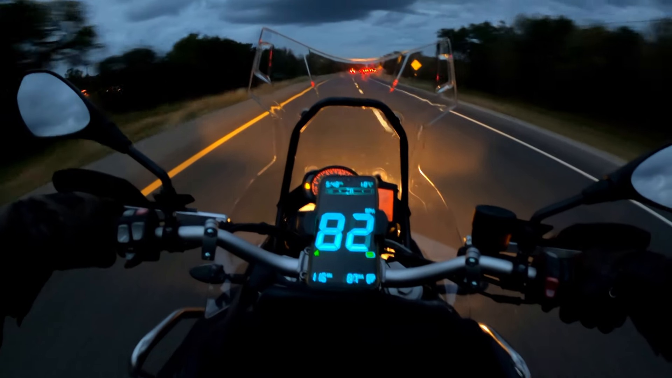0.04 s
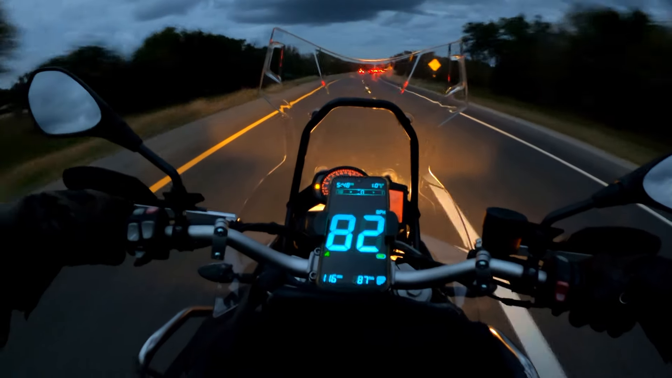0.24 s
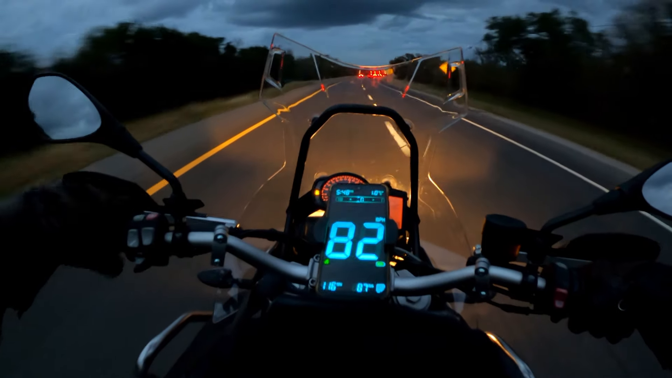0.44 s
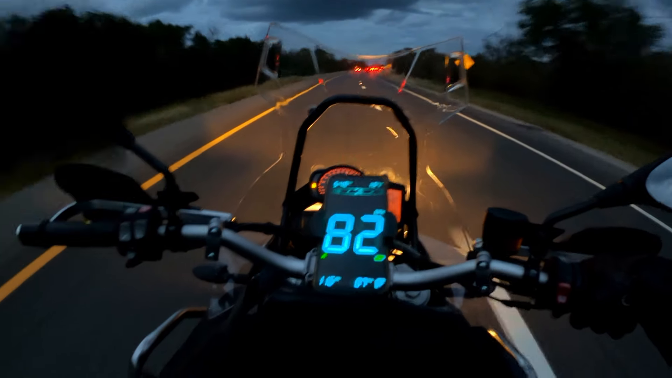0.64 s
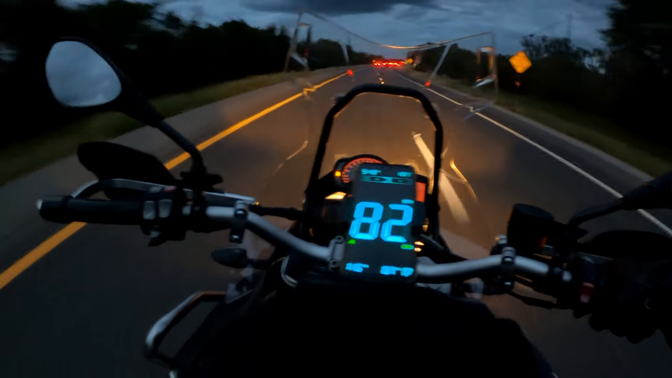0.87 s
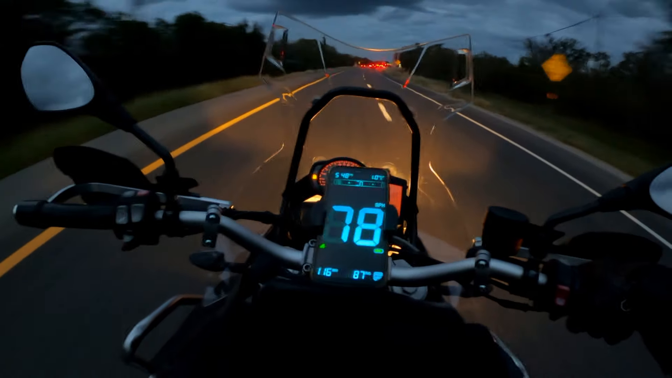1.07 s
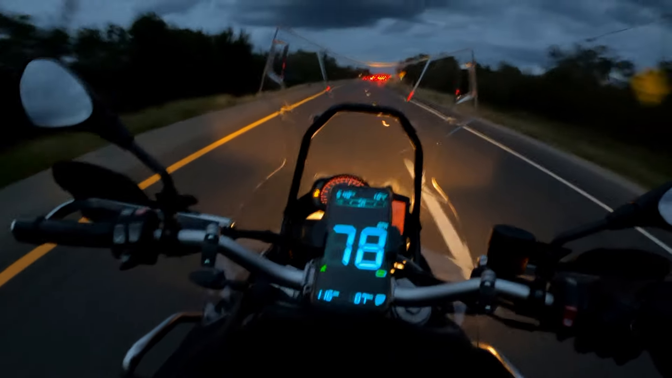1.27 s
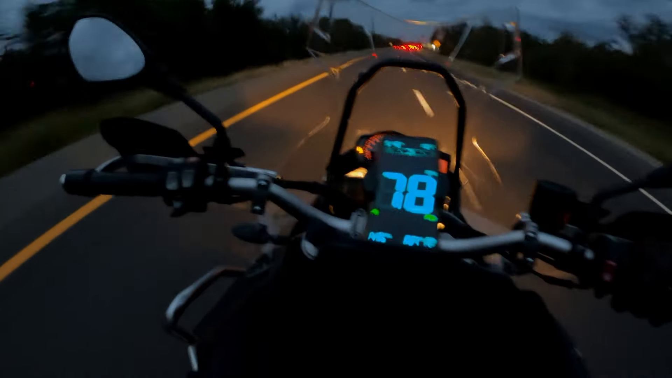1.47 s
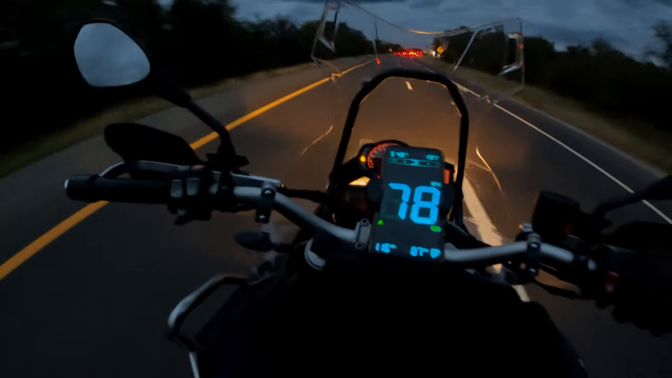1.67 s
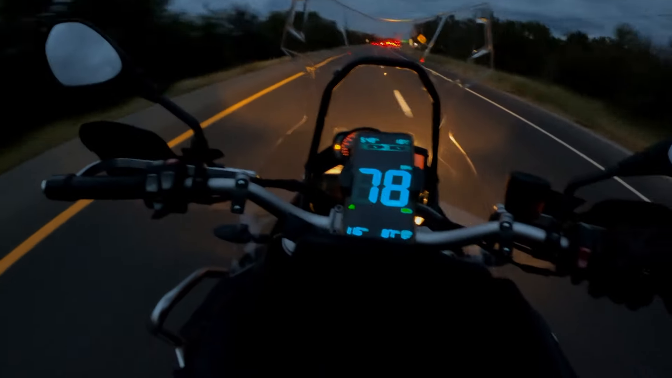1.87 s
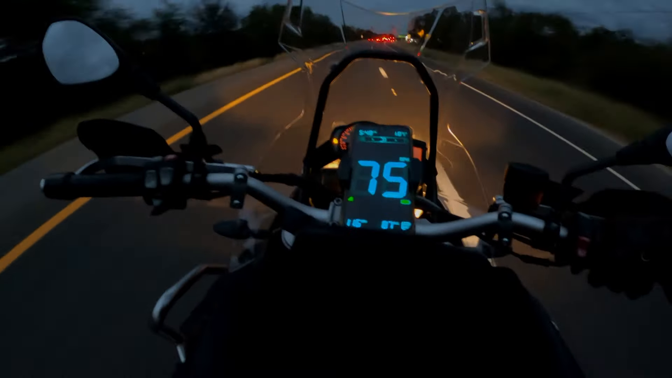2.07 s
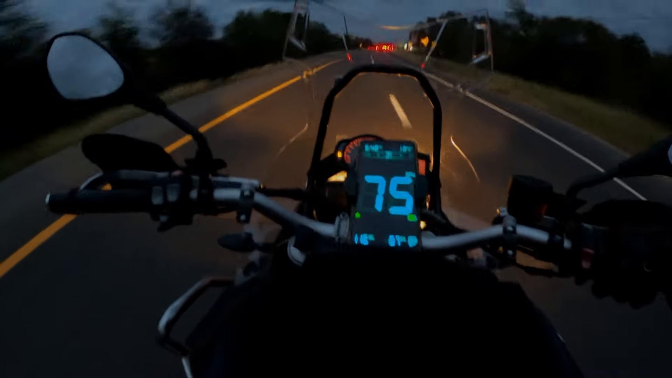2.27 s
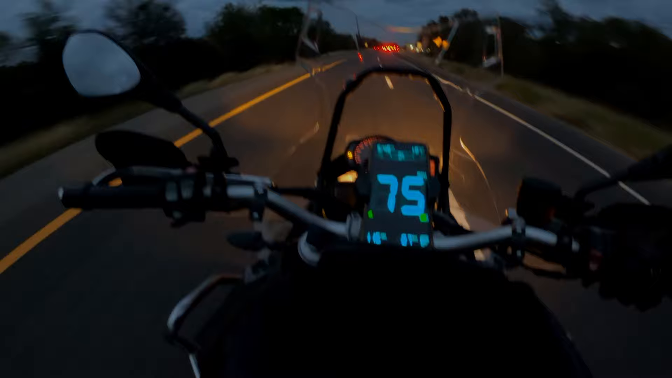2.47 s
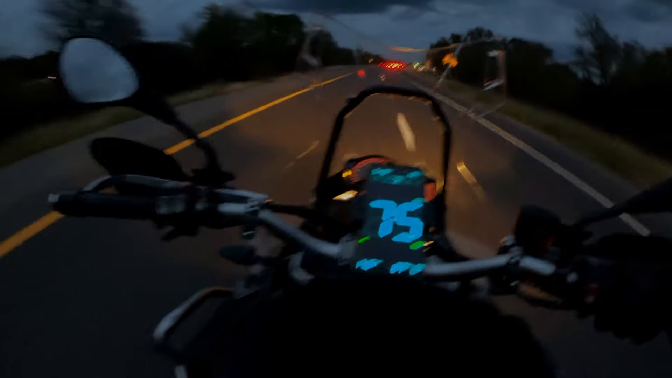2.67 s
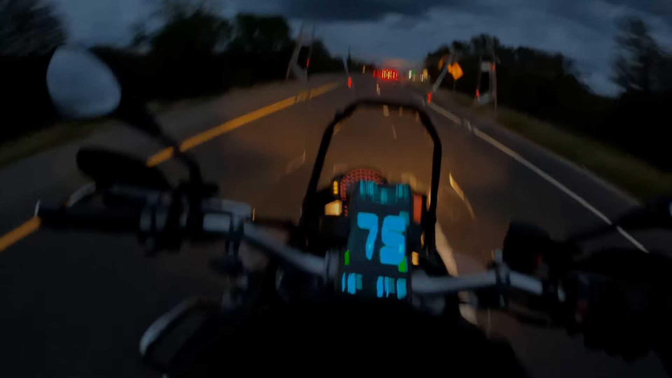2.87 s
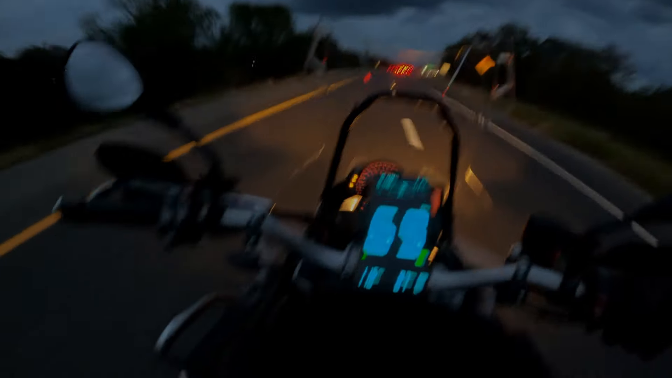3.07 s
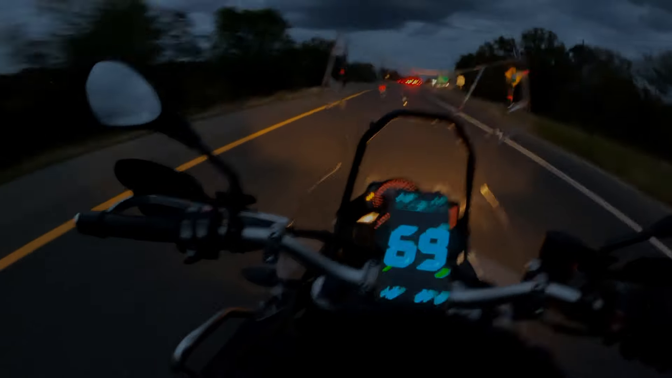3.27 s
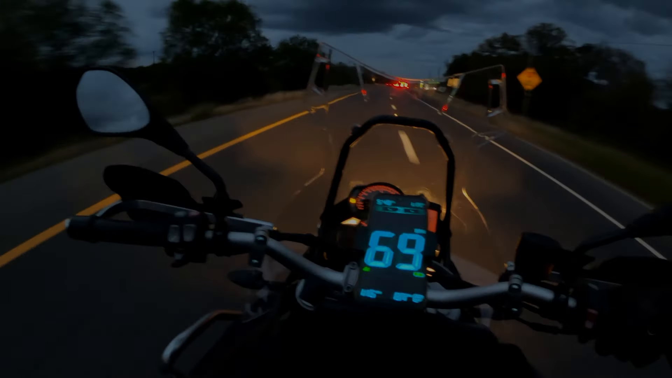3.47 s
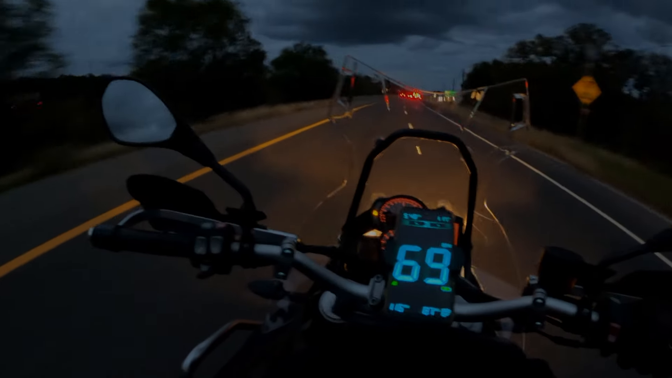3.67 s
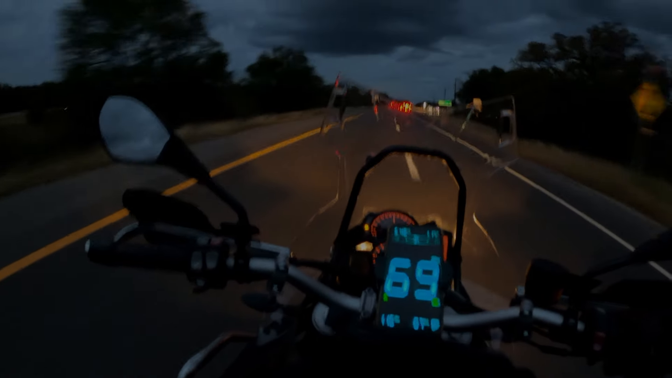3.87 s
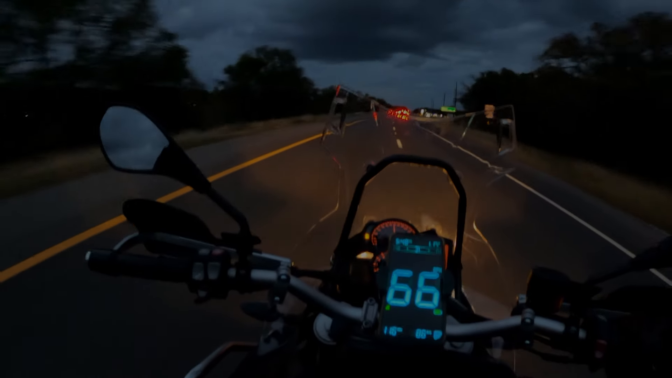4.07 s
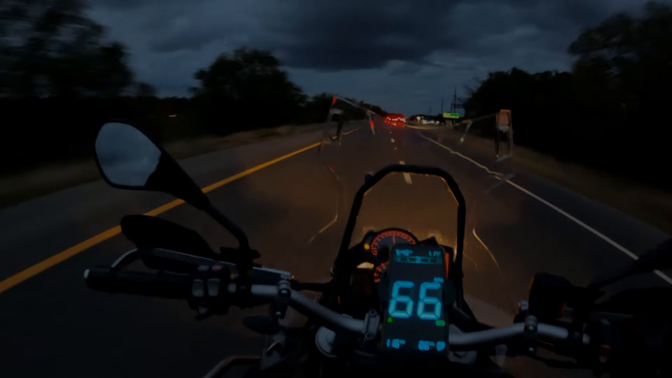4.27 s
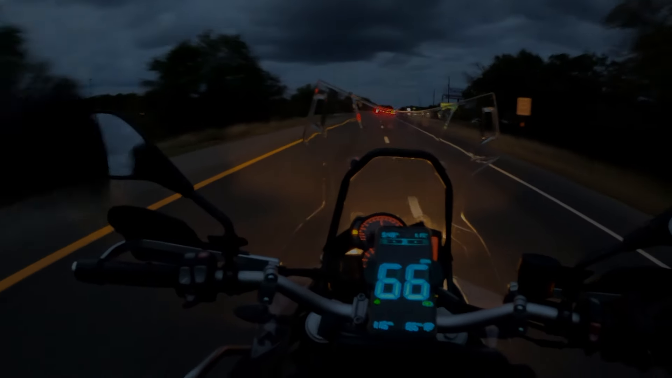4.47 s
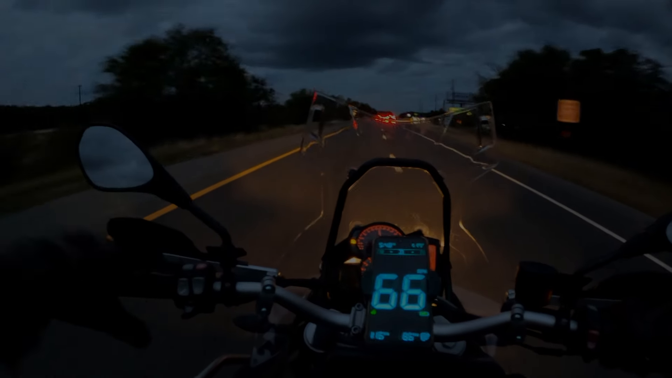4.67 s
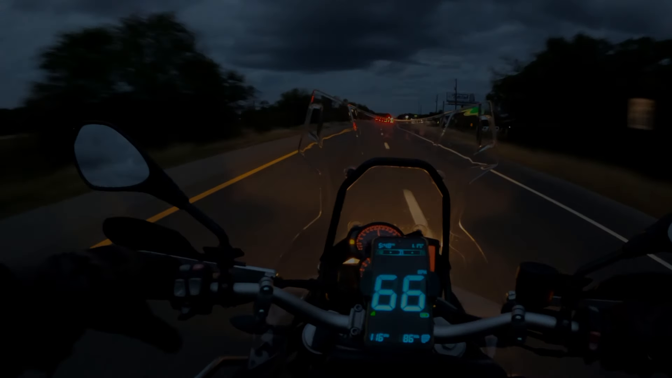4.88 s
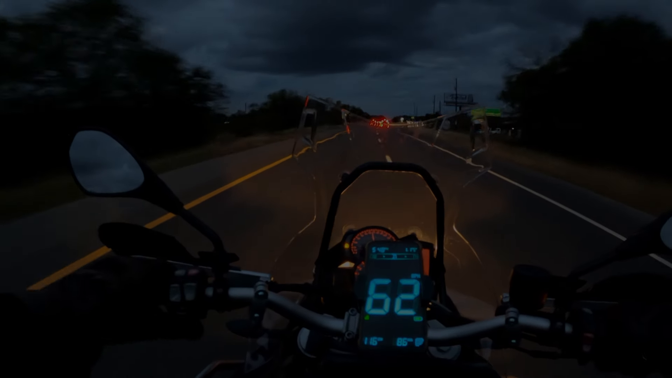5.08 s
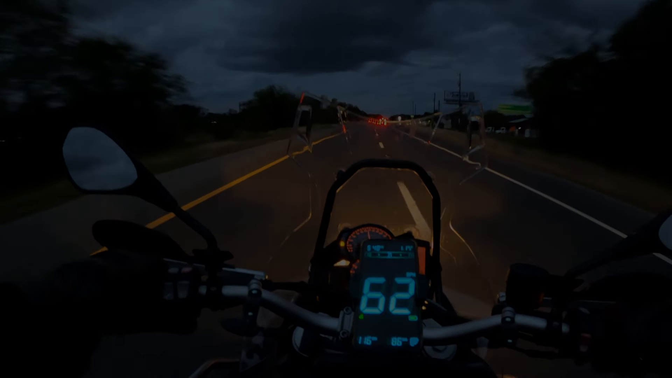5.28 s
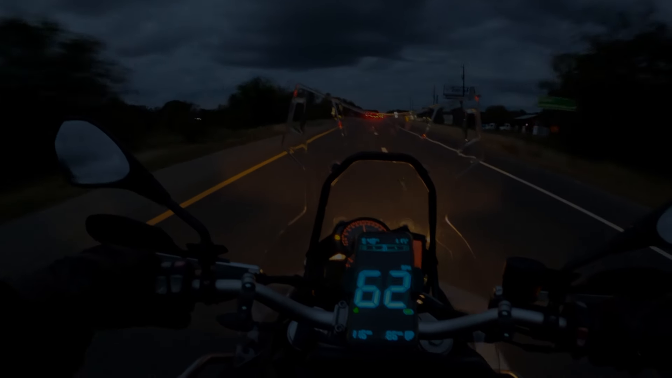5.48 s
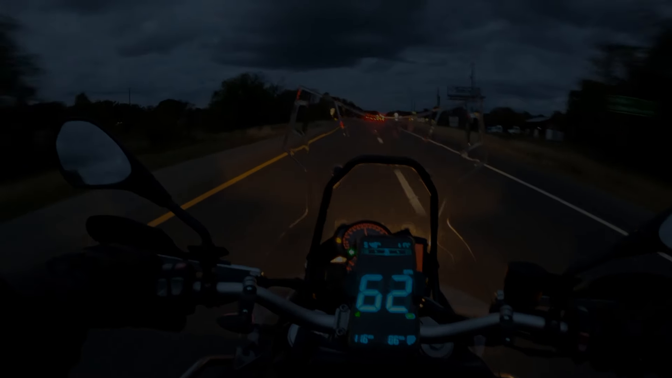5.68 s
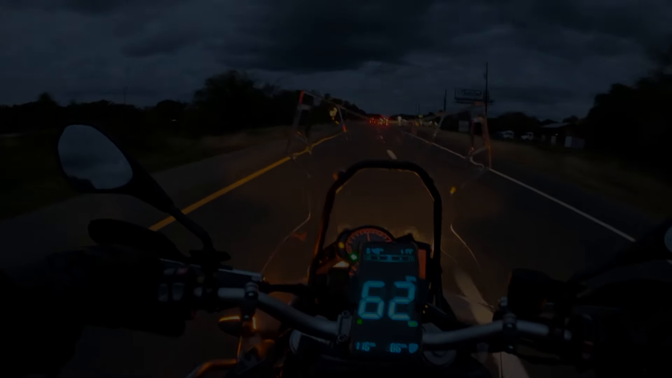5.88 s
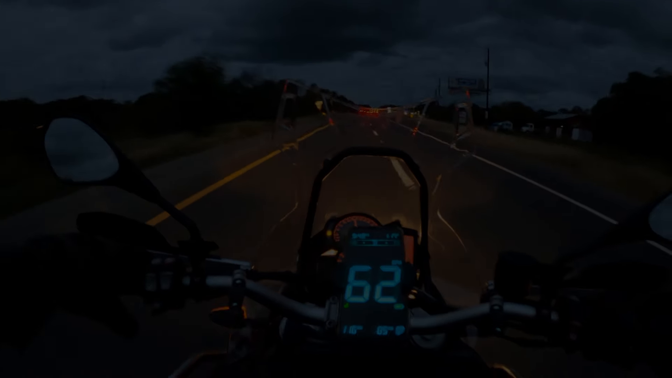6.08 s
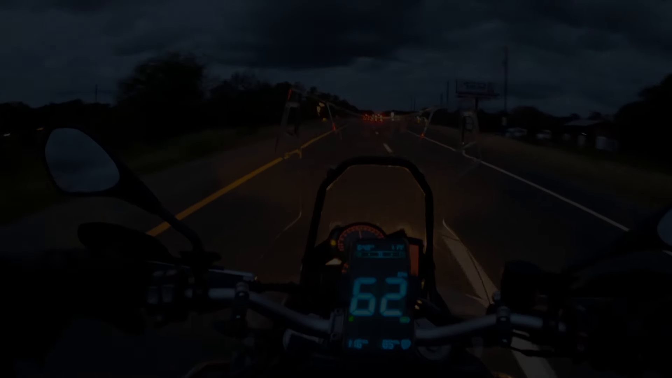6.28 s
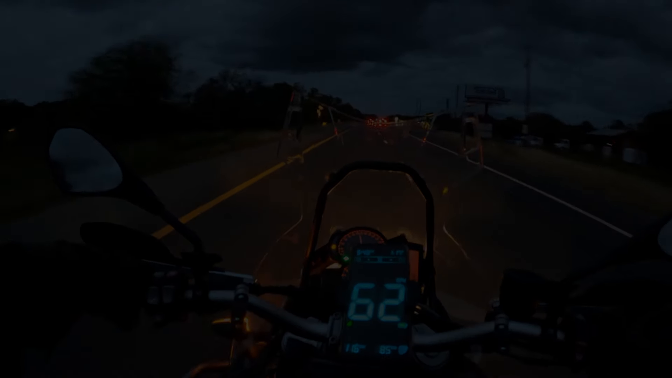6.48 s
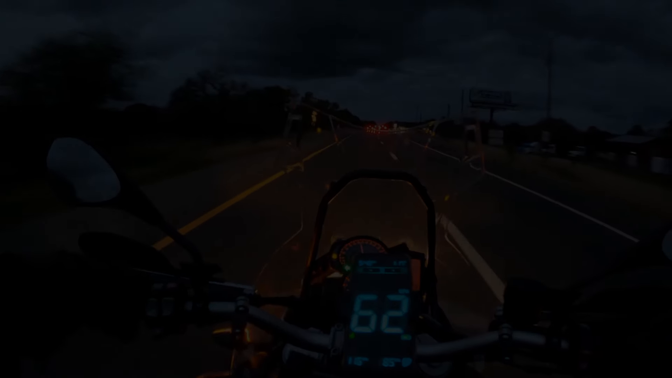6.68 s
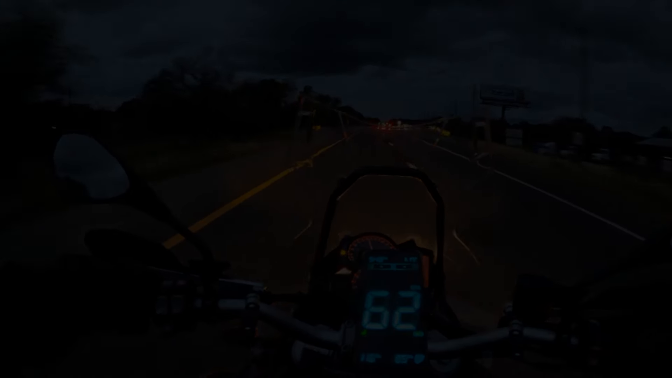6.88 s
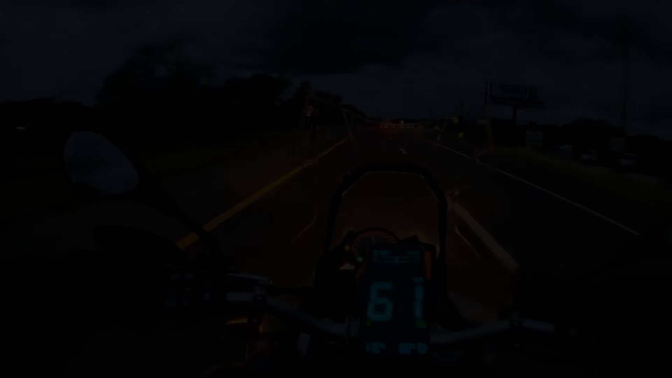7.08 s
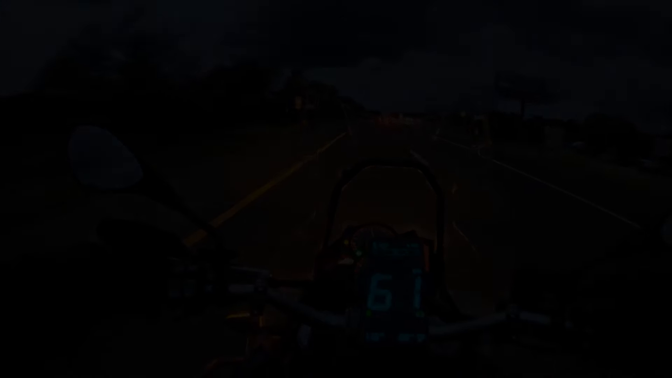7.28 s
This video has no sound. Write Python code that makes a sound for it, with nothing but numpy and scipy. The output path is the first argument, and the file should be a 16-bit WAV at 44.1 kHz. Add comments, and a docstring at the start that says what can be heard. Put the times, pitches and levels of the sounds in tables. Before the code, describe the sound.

Close, lumpy wind noise dominates from the first moment, loud and slightly overloaded, with rapid gusts, tiny gaps and fine sizzling ticks. A deep, uneven motorcycle engine hum sits under it and sinks in pitch with slowing speed. Outdoors on a road, with no echo; the wind and engine weaken together in a long fade lasting until the end.

```python
"""Ragged blasts and lulls of wind tear past a microphone on the rider of a slowing motorcycle.
The wind is layers of shaped noise, from low rumble to fine sizzle, swelling and sinking with shared changes.
Underneath, a twin-cylinder engine drones as a stack of tones whose pitch falls with road speed.
Bands of noise, short or long, swell and sink within the wind; ticks are brief changes of the highest hiss.
The whole sound fades away."""
import sys
import numpy as np
from scipy import signal
from scipy.fft import rfft, irfft, next_fast_len
from scipy.io import wavfile
from scipy.ndimage import uniform_filter1d

SR = 44100
rng = np.random.default_rng(int(sys.argv[2]) if len(sys.argv) > 2 else 0)


def wrap_up_sound(samples):
    """Save the sound to the file named by the first command line argument, as 16-bit audio."""
    columns = np.atleast_2d(samples).T
    # keep every value between -1 and 1, then stretch to whole-number steps
    tamed = np.clip(columns, -1, 1)
    steps = np.round(tamed * 32767).astype(np.int16)
    wavfile.write(sys.argv[1], SR, steps)


N = 323694
TIME = np.arange(N) / SR   # seconds


def from_db(db):
    """Turn decibels into gain."""
    return 10 ** (np.asarray(db) / 20)


def rms_one(x):
    """Scale a signal to unit power."""
    return x / np.sqrt(np.mean(x ** 2) + 1e-20)


def noise():
    """White noise, the raw material of all the wind."""
    return rng.standard_normal(N)


def curve(rows):
    """Join the (time, value) points of a table by straight lines, at every sample."""
    times, values = np.transpose(rows)
    return np.interp(TIME, times, values)


def coloured(x, spectrum):
    """Give a signal the tone colour of a (frequency, level) table, at unit power."""
    hz, level_db = np.transpose(spectrum)
    size = next_fast_len(N)
    bins_hz = np.maximum(np.arange(size // 2 + 1) * SR / size, 1)
    gain = from_db(np.interp(np.log(bins_hz), np.log(hz), level_db, left=-120, right=-120))
    return rms_one(irfft(rfft(x, size) * gain, size)[:N])


def wander(rate_hz):
    """Random motion with all speeds up to a given rate; spread 1."""
    sos = signal.butter(2, rate_hz, fs=SR, output="sos")
    settled = signal.sosfilt(sos, rng.standard_normal(N + SR))[SR:]
    return rms_one(settled)


def steadied(x, span_s):
    """Hold the power even over a span, keeping all faster swings."""
    size = int(span_s * SR)
    power = uniform_filter1d(uniform_filter1d(x ** 2, size), size)
    return x / np.sqrt(power + 1e-12)


def bell(times, centre_s, half_length_s):
    """A smooth bump in time, 1 at its centre."""
    return np.exp(-.5 * ((times - centre_s) / half_length_s) ** 2)


def swells(rows):
    """Add up bell-shaped rises and drops in dB, one curve for each level column."""
    change_db = np.zeros((len(rows[0]) - 2, N))
    for s, length, *peaks_db in rows:
        near = slice(*np.searchsorted(TIME, [s - 4 * length, s + 4 * length]))
        change_db[:, near] += np.outer(peaks_db, bell(TIME[near], s, length))
    return change_db


# how fast the motorcycle goes: (time [s], road speed [mph])
SPEED = [(0, 83), (1, 79.5), (2, 76), (3, 71.5), (4, 67.5), (5, 64), (6, 61.5), (7.34, 59.5)]


def road_speed():
    """The bike slows down, which moves the engine pitch and the deep thumps; mph."""
    return curve(SPEED)


# level of the upper wind, scaled by each layer that uses it: (time [s], level [dB])
UPPER_WIND = [(0, -2), (0.35, -1.2), (0.85, -3), (1.2, 0.5), (1.63, -5.5), (1.85, -2.5), (2.2, -3.5),
              (2.9, -3.5), (3.15, -4.5), (3.7, -6), (4.2, -6), (4.42, -11), (4.7, -9.5), (5.15, -11),
              (5.75, -14), (6.05, -16), (6.6, -16), (7.34, -25.5)]


def upper_wind_level():
    """The upper wind's level sinks unevenly and fades out; dB."""
    return curve(UPPER_WIND)


def lesser_changes(count=200, per_s=7, half_s=0.0037, roar_db=-3.5, hiss_db=0.5):
    """Brief changes at random times weaken the roar and lift the hiss a little; rows as for the lulls."""
    gap, length, roar, hiss = rng.random((count, 4)).T
    s = np.cumsum(-np.log(1 - gap)) / per_s
    half_lengths_s = half_s * 2 ** (2 * length - 1)
    return np.transpose([s, half_lengths_s, roar_db * 2 * roar, hiss_db * 2 * hiss])


# brief changes of the wind, mostly rises of roar or hiss; each wind layer scales them:
# (time [s], half length [s], change of roar [dB], change of hiss [dB])
BLASTS = [(0.025, 0.0048, 13, 4.5), (0.074, 0.0092, 5, 0.5), (0.197, 0.0022, 6, 3), (0.244, 0.004, 3, 3),
          (0.287, 0.0032, 3, 0), (0.32, 0.015, 7, 1.5), (0.392, 0.0045, 6, -4), (0.469, 0.0024, 7, -3),
          (0.538, 0.009, 6.5, 5), (0.62, 0.01, 11, 3.5), (0.718, 0.0071, 1, 3), (0.768, 0.014, 2, 3),
          (0.997, .009, 5, 1), (1.232, 0.011, 1.5, 2), (1.311, 0.0017, 1, 5), (1.345, 0.0043, 4, -4),
          (1.379, .0085, 9, 2), (1.441, 0.0055, 6, 6), (1.485, .0047, 8, 8), (1.531, 0.0022, 11, -2),
          (1.573, 0.0081, 4, 4), (1.657, 0.0069, 10, 1.5), (1.711, 0.0068, -1, -0.5),
          (1.82, 0.017, -2, 3.5), (1.934, 0.029, 1.5, 3.5), (2.041, .0049, 2, 3.5), (2.08, .003, -1, 6),
          (2.222, 0.0026, 3, 7), (2.466, .0045, 5, 0), (2.489, .003, 3, 6), (2.722, .003, 2, 3),
          (2.909, .0025, 9, 5), (3.033, .0045, 4, 4.5), (3.163, 0.0026, -6, 3), (3.693, .0063, 6, 8),
          (3.814, 0.0034, 1, 7), (3.882, 0.0051, 4.5, 5.5), (4.161, .011, 0.5, 3), (4.457, .011, 1.5, 0),
          (4.602, 0.0036, 14, 3), (4.653, .004, 4, -5), (4.704, 0.044, 1.5, 2), (4.976, .0053, 3, 10),
          (5.152, 0.0082, -1, 6), (5.352, 0.0078, 3.5, 6), (5.399, 0.0026, 2, 5), (5.428, 0.0027, -1, 5),
          (5.612, 0.0076, 7, 4), (5.786, 0.014, 4.5, 3), (5.84, .005, 4, 4), (5.923, .006, 15, -1),
          (5.978, 0.0045, 7, 3), (6.095, 0.009, 4, 2), (6.261, 0.0088, 3, 1.5), (6.308, 0.0062, -1, 3),
          (6.438, 0.0021, 1, 5), (6.625, .01, -1, 3.5), (6.918, .006, 0, 5), (6.968, 0.0027, -6, 7),
          (7.013, 0.0084, 4, 1), (7.098, 0.01, -3, 4), (7.219, 0.011, 1, 3)]
# brief drops of the wind, shallow or deep, mostly in both roar and hiss, scaled likewise:
# (time [s], half length [s], change of roar [dB], change of hiss [dB])
LULLS = [(0.215, 0.0071, -3, -4), (0.378, 0.0055, -4, -4), (0.447, 0.0037, -8, -35),
         (0.511, 0.0034, -10, -9), (0.605, 0.0054, -14, -3.5), (0.644, 0.0028, -10, -5),
         (0.8, 0.01, -4, 0.5), (0.9, .008, 2, -4), (1.291, 0.0055, -9, -17), (1.406, 0.0057, -25, -8),
         (1.508, 0.0043, 1, -3), (1.543, 0.0067, -3, -2), (1.633, 0.0065, -12, -0.5),
         (1.682, 0.0074, -9.5, -2), (1.887, 0.0099, -6, -2.5), (1.978, 0.01, -18, -8),
         (2.157, 0.0037, -11, -6), (2.387, 0.0042, -8, -4), (2.545, 0.021, -2.5, -8), (2.68, 0.011, 0, -6),
         (2.838, 0.0044, -8, -9), (2.988, 0.0073, -10, -7), (3.115, 0.0058, -17, -12),
         (3.262, 0.013, -4, -1), (3.524, 0.0051, -7, -5), (3.562, 0.0032, -23, -7),
         (3.604, 0.0039, -11, -7), (3.907, 0.0039, -18, -6), (4.099, 0.0027, -9, -8),
         (4.287, 0.0054, -12, 1), (4.312, 0.0046, -17, -6), (4.422, 0.0052, -19, -1),
         (4.536, 0.0045, -15, -1), (4.577, 0.0036, -16, -17), (4.809, 0.0035, -15, -7),
         (5.06, 0.0023, -6, -14), (5.102, 0.009, -9, -7), (5.275, 0.0047, -42, -10), (5.45, 0.0051, -9, -2),
         (5.5, 0.0089, -20, -2), (5.707, 0.011, -3.5, -6), (5.86, 0.0055, -12, 6), (5.938, 0.009, -10, -3),
         (6.025, 0.0058, -23, -4), (6.175, 0.014, -9, -2.5), (6.288, 0.0038, -10, -3),
         (6.411, 0.0038, -6, -3), (6.484, 0.0038, -11, -4), (6.662, 0.0031, -10, -5),
         (6.739, 0.0057, -16, -8), (6.803, 0.013, -2, -4), (6.84, 0.0081, 1, -5), (6.95, 0.0035, -13, -10),
         (7.045, 0.0088, -7, -3), (7.17, .02, -2, 0), (7.295, 0.026, -3.5, 1.5)]


def blasts_and_lulls():
    """Brief changes of the roar and the hiss add up, levelling off softly where they grow large; dB."""
    change_db = swells(BLASTS) + swells(LULLS) + swells(lesser_changes())
    # one row for the roar, one for the hiss
    rise_limit_db, drop_limit_db = [[8.5], [5.5]], [[31], [16]]
    limit_db = np.where(change_db > 0, rise_limit_db, drop_limit_db)
    return limit_db * np.tanh(change_db / limit_db)


# colour of the deep thumps: (frequency [Hz], level [dB per Hz])
THUMP = [(12, -37), (23, -10.5), (30, -5.5), (45, -4.5), (62, -2), (85, -21), (140, -19.5)]
# colour of the low buffeting: (frequency [Hz], level [dB per Hz])
BUFFET = [(35, -6), (58, -7), (84, 4), (102, -1), (122, -0.5), (160, -13), (230, -25), (400, -47.5)]


def buffeting(mph):
    """Large eddies press on the microphone as a lumpy rumble, the slowest as deep thumps."""
    # above 77.6 mph the thumps thin out
    thump_db = -0.3 - 1.9 * np.maximum(mph - 77.6, 0)
    thump = from_db(thump_db) * coloured(noise(), THUMP)
    return steadied(thump + coloured(noise(), BUFFET), span_s=0.034)


# level of the low buffeting, before a small lift: (time [s], level [dB])
RUMBLE_LEVEL = [(0, -15.5), (1.6, -19.5), (2.35, -18.5), (3.2, -21.5), (4.15, -24), (4.55, -26),
                (5.35, -27), (6.05, -29.5), (6.6, -35), (7.34, -39.5)]
# the low buffeting heaves and slackens: (time [s], half length [s], change [dB])
HEAVES = [(0.14, 0.014, -16), (0.9, .012, -3), (1.3, .012, -2), (1.625, .02, -7), (2.12, .012, -8),
          (2.555, 0.013, -9), (3.01, .016, -7), (3.49, .018, -15), (4.266, 0.01, 6), (4.42, 0.013, -9),
          (4.543, 0.011, -4), (5.229, 0.014, -10), (5.867, .012, -9), (6.03, 0.017, -16), (6.165, .02, -7),
          (6.264, .012, 5), (6.8, .014, -12), (6.918, 0.011, 4)]


def rumble(pressure, roar_change_db):
    """The low pressure swings heave and slacken, and sink partway in the lulls."""
    heave_db, = swells(HEAVES)
    lull_db = 0.45 * np.minimum(roar_change_db, 0)
    return from_db(curve(RUMBLE_LEVEL) + 1.3 + heave_db + lull_db) * pressure


def flutter(pressure, tearing_db=3.0, puff_db=2.57, ripple_db=3.5, lead_s=0.0068):
    """Flow tears off just ahead of each pressure swing, in puffs and smaller eddies; dB, before scaling."""
    swing = rms_one(signal.sosfilt(signal.butter(1, 50, fs=SR, output="sos"), pressure))
    tearing = tearing_db * np.tanh(np.interp(TIME + lead_s, TIME, swing))
    puffs = puff_db * np.tanh(wander(rate_hz=85))
    ripples = ripple_db * np.tanh(wander(rate_hz=227))
    return tearing + puffs + ripples


def spits(per_s=70, rise_db=1.5, decay_s=0.0044):
    """Tight vortices snap past at random: sudden rises of random size up to rise_db, and a quick decay."""
    snaps = (rng.random(N) < per_s / SR) * rng.random(N)
    # the tiny offset keeps the filter from running on vanishing numbers
    return rise_db * signal.lfilter([1], [1, -np.exp(-1 / (decay_s * SR))], snaps + 1e-18)


def turbulence(spectrum, change_db, flutter_db, clump_db, grain_db, smooth_db):
    """Tiny vortices burst in clumps where the flow tears off, over a smooth stream that fills the lulls."""
    clumps_db = clump_db * np.tanh(wander(rate_hz=22.8))
    grains_db = grain_db * np.tanh(wander(rate_hz=530))
    bursts = noise() * from_db(flutter_db + clumps_db + grains_db)
    stream = from_db(smooth_db) * coloured(noise(), spectrum)
    return from_db(change_db) * steadied(coloured(bursts, spectrum), span_s=0.041) + stream


# level of the roar, before a small cut: (time [s], level [dB])
ROAR_LEVEL = [(0, -22), (0.8, -20.5), (1.05, -19), (1.55, -24.5), (1.75, -20), (2.3, -21), (2.95, -22),
              (3.35, -22.5), (4.3, -25), (4.75, -27.5), (5.65, -29), (6.05, -33), (6.55, -33),
              (7.34, -41.5)]
# colour of the roar: (frequency [Hz], level [dB per Hz])
ROAR = [(90, -11), (160, -2.5), (195, -0.5), (235, -1.9), (290, -2.04), (400, -4), (600, -8.5),
        (850, -12.5), (1500, -27), (3000, -65)]


def roar(roar_change_db, flutter_db):
    """The body of the wind: turbulence that swells and sinks with the blasts and lulls."""
    torn = turbulence(ROAR, 0.67 * roar_change_db, 1.12 * flutter_db,
                      clump_db=1.7, grain_db=0.5, smooth_db=-18.0)
    return from_db(curve(ROAR_LEVEL) - 1.4) * torn


# colour of the rush: (frequency [Hz], level [dB per Hz])
RUSH = [(300, -21), (550, -3.5), (800, -0.5), (1050, -1.5), (1500, -4.5), (2100, -10), (3000, -19),
        (6000, -54)]


def rush(wind_db, middle_change_db, crackle_db):
    """The middle of the wind: turbulence that follows the upper wind's level dB for dB."""
    torn = turbulence(RUSH, 1.4 * middle_change_db, 0.96 * crackle_db,
                      clump_db=2.0, grain_db=2.5, smooth_db=-27.0)
    return from_db(-27.5 + wind_db) * torn


# level of the highest hiss on top of the upper wind's level, a third as strong in the hiss:
# (time [s], level [dB])
TREBLE = [(0, 2), (0.8, -1), (1.2, -0.5), (1.7, -3), (2.15, -7.5), (2.4, -1.5), (2.8, -1), (3.05, -1),
          (3.24, -2.5), (3.42, 3.5), (3.7, -2), (4.5, 0.5), (5.25, -3.5), (6.2, 1.5), (7.34, 1.5)]


def treble():
    """The top of the wind brightens and dulls along the way; dB."""
    return curve(TREBLE)


# colour of the hiss: (frequency [Hz], level [dB per Hz])
HISS = [(1200, 0.5), (2000, -1), (2800, 1), (4400, -2.5), (5800, -11), (7400, -20.5), (9000, -38),
        (12000, -65)]


def hiss(wind_db, treble_db, hiss_change_db, crackle_db):
    """Fine turbulence hisses, and sinks a little faster than the rush."""
    torn = turbulence(HISS, 1.65 * hiss_change_db, 0.92 * crackle_db,
                      clump_db=3.5, grain_db=3.5, smooth_db=-11.0)
    return from_db(-36.5 + 1.098 * wind_db + 0.33 * treble_db + 0.57) * torn


# colour of the sizzle, the highest hiss: (frequency [Hz], level [dB per Hz])
SIZZLE = [(3500, -24.5), (5500, -2.5), (7300, -2.5), (8800, -12), (10200, -19), (12000, -27.5),
          (15000, -37)]


def sizzle(wind_db, treble_db, hiss_change_db, crackle_db):
    """The finest turbulence sizzles, follows the upper wind's level most steeply, and carries the ticks."""
    # a few very tight vortices also tick at random
    random_ticks_db = spits(per_s=7.5, rise_db=20.5, decay_s=0.0012)
    torn = turbulence(SIZZLE, 1.95 * hiss_change_db + ticks(), 0.5 * crackle_db + random_ticks_db,
                      clump_db=4.5, grain_db=4.0, smooth_db=-15)
    return from_db(-48.5 + 1.32 * wind_db + treble_db) * torn


# exhaust tones, levels relative to each other: (multiple of the firing rate [1], level [dB])
EXHAUST = [(.5, -6.5), (1, 0), (1.5, -3.5), (2, -17.5), (2.5, -9.5), (3, -19.5), (4, -41)]
# level of the whole engine: (time [s], level [dB])
ENGINE_LEVEL = [(0, -22), (0.8, -27.5), (1.6, -22), (4.2, -38.5), (6, -40), (7.34, -58)]


def engine(mph, unsteady=0.0028, rough_db=0.0):
    """Two unevenly spaced firings per cycle give tones at half multiples of the firing rate."""
    firings_per_s = 1.129 * mph * (1 + unsteady * wander(rate_hz=9.2))
    firings = np.cumsum(firings_per_s) / SR
    drone = np.zeros(N)
    for multiple, level_db in EXHAUST:
        phase = 2 * np.pi * (multiple * firings + rng.random())
        drone += from_db(level_db + rough_db * wander(rate_hz=12)) * np.sin(phase)
    return from_db(curve(ENGINE_LEVEL)) * rms_one(drone)


# bands of noise within the wind, before the lulls weaken them:
# (time [s], half length [s], centre frequency [Hz], level [dB])
BANDS = [(0.25, 0.22, 220, -26), (1.12, 0.27, 227, -26.5), (1.45, 0.064, 117, -21),
         (1.413, 0.15, 895, -34.5), (1.704, 0.078, 173, -23), (1.68, 0.044, 376, -26),
         (1.974, 0.28, 200, -30), (2.2, 0.056, 288, -24.5), (2.15, 0.25, 54.3, -24),
         (3.26, 0.095, 188, -30), (3.36, 0.17, 328, -30), (4.068, 0.14, 257, -32), (4.35, 0.046, 116, -26),
         (4.764, 0.11, 1160, -44), (5.197, 0.11, 147, -31), (5.284, 0.097, 49, -26.5),
         (5.473, 0.049, 191, -30), (5.65, .35, 690, -47), (6.7, 0.32, 1120, -54.5),
         (6.096, 0.041, 397, -37.5), (6.5, 0.48, 72, -36), (6.55, 0.17, 113, -38)]


def noise_bands(roar_change_db, width_octaves=0.24):
    """Bands of noise, short or long, swell and sink within the wind, weaker in the lulls."""
    out = np.zeros(N)
    for s, length, hz, level_db in BANDS:
        # the width reaches this far to either side of the centre
        edges_hz = hz * 2 ** (width_octaves * np.array([-1, 1]))
        sos = signal.butter(2, edges_hz, "band", fs=SR, output="sos")
        band = steadied(signal.sosfilt(sos, noise()), span_s=0.084)
        out += from_db(level_db) * bell(TIME, s, length) * band
    return from_db(0.5 * np.minimum(roar_change_db, 0)) * out


# brief changes of the highest hiss, mostly rises: (time [s], half length [s], change [dB])
TICKS = [(2.325, 0.0011, 17), (2.418, .001, 12), (2.456, .002, 15), (2.874, .002, 5), (2.909, .001, -3),
         (4.905, .002, 9), (5.153, 0.00092, 12)]


def ticks():
    """The highest hiss jumps for a moment, heard as ticks; dB."""
    return swells(TICKS)[0]


def scene():
    """All wind layers share the blasts and lulls, the upper ones one level; the engine lies half buried."""
    mph, wind_db, treble_db = road_speed(), upper_wind_level(), treble()
    roar_change_db, hiss_change_db = blasts_and_lulls()
    middle_change_db = (roar_change_db + hiss_change_db) / 2
    pressure = buffeting(mph)
    flutter_db = flutter(pressure)
    # only the upper layers are quick enough to spit
    crackle_db = flutter_db + spits()
    low_wind = rumble(pressure, roar_change_db) + roar(roar_change_db, flutter_db)
    high_wind = (rush(wind_db, middle_change_db, crackle_db)
                 + hiss(wind_db, treble_db, hiss_change_db, crackle_db)
                 + sizzle(wind_db, treble_db, hiss_change_db, crackle_db))
    return (low_wind + high_wind + engine(mph) + noise_bands(roar_change_db))[None]


def record(dry, ceiling=0.6, cutoff_hz=15000):
    """The microphone rounds off the strongest peaks, and the top is cut."""
    rounded = dry / (1 + (dry / ceiling) ** 6) ** (1 / 6)
    return signal.sosfilt(signal.cheby2(12, 70, cutoff_hz, fs=SR, output="sos"), rounded)


dry = scene()
out = record(dry)
wrap_up_sound(out)
```